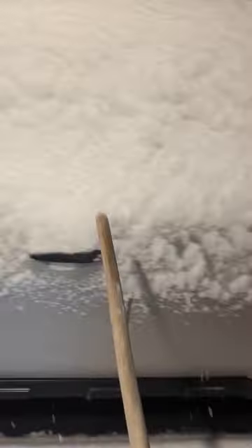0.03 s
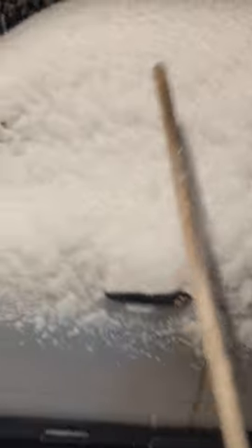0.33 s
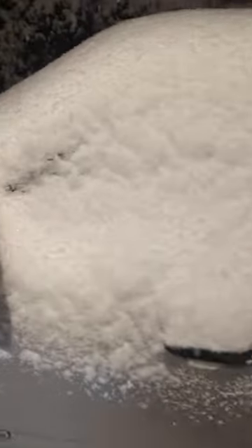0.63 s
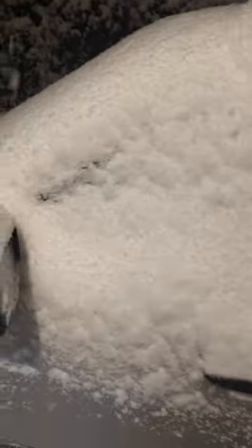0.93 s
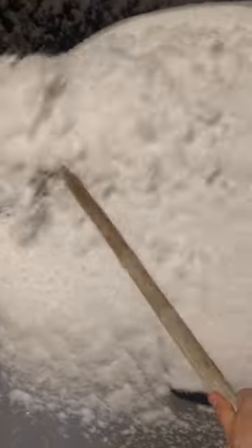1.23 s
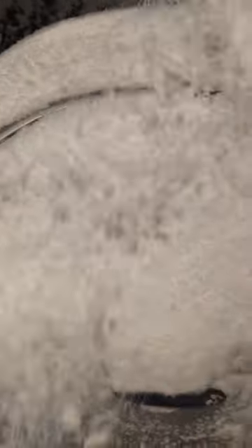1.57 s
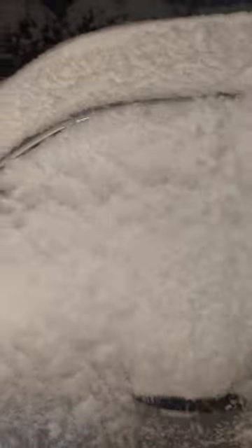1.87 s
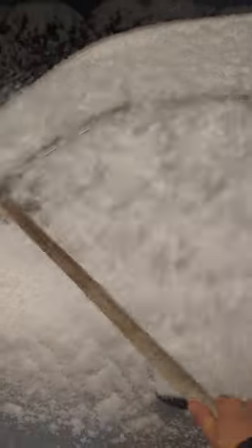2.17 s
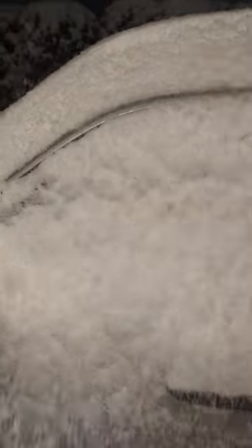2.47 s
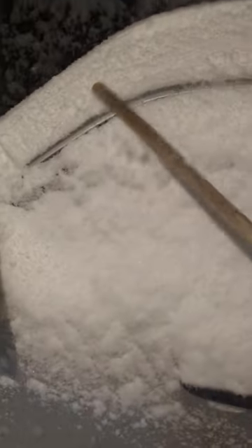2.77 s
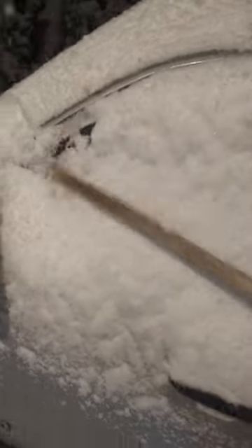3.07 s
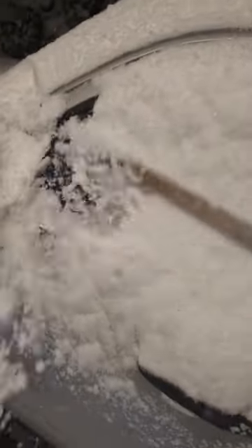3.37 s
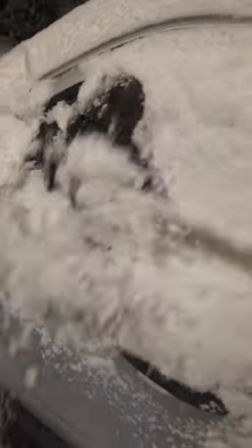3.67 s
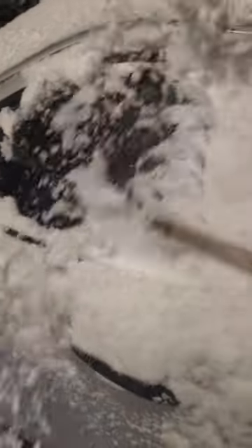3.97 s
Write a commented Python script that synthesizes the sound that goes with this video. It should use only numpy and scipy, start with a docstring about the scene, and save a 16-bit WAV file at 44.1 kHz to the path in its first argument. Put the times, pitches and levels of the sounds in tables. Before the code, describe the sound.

A wooden stick sweeps snow off a parked car in two close, crackling strokes after a muffled footstep. It then crunches through the crust, knocks dully on the door and scrapes the window, over a faint low drone outdoors.

```python
"""Sweeping snow off a parked car.

On a quiet night, a step packs the snow with dull thuds. A wooden stick makes two wide, close sweeps:
grains rustle, powder hisses, single fractures crackle. Its tip then breaks the crust, knocks on the
snow-padded door and scrapes across the window. A deep drone, like an idling engine, lies underneath."""
import sys
import numpy as np
from scipy import signal
from scipy.fft import rfft, irfft
from scipy.io import wavfile
from scipy.ndimage import uniform_filter1d

SR = 44100
rng = np.random.default_rng(int(sys.argv[2]) if len(sys.argv) > 2 else 0)


def unload_wav(signal):
    """Save mono or channel-first audio to the path in sys.argv[1] as 16-bit WAV at rate SR, clipped to [-1, 1]."""
    wavfile.write(
        sys.argv[1],
        SR,
        np.round(np.clip(np.atleast_2d(signal).T, -1, 1) * 32767).astype(np.int16),
    )


N = 176400
T = np.arange(N) / SR

# Vigour of the stick's motions. Each row: time in seconds, relative level in dB.
FIRST_SWEEP = [(.97,-85),(1.13,-49),(1.205,-43.5),(1.25,-46.5),(1.298,-66.5),(1.328,-48.5),(1.385,-87),(1.48,-82)]
RETURN_SWING = [(1.498,-52.5),(1.585,-66),(1.64,-45),(1.658,-65.5),(1.686,-41),(1.768,-47),(1.82,-54.5),(1.907,-56),(1.932,-83)]
SECOND_SWEEP = [(1.946,-50),(1.985,-51.5),(2.03,-48.5),(2.109,-43.5),(2.129,-63.5),(2.173,-49.5),(2.19,-31),(2.218,-39.5),(2.234,-48.5),(2.33,-66),(2.524,-52.5),(2.592,-78.5),(2.652,-60.5),(2.679,-100)]
POKING = [(2.70,-88),(2.76,-68.5),(2.85,-55.5),(2.895,-57.5),(3.04,-85.5),(3.18,-62),(3.28,-71.5),(3.40,-64.5),(3.73,-64),(3.82,-82),(3.885,-47.5),(3.96,-77)]
SCRAPE = [(3.35,-75),(3.39,-47),(3.52,-46.5),(3.665,-49),(3.71,-70)]
# Fractures in the sweeps. Each row: start in seconds, relative level in dB.
CRACKLES = [(1.002,-40),(1.195,-25.5),(1.243,-25.5),(1.259,-26),(1.2744,-18),(1.279,-39),(1.3097,-19),(1.3245,-25),
            (1.356,-39.5),(1.447,-46.5),(1.4949,-21.5),(1.503,-26),(1.5327,-29.5),(1.5569,-26.5),(1.6317,-36),(1.6383,-31),
            (1.681,-26),(1.691,-28),(1.7126,-32),(1.7417,-27),(1.769,-28),(1.8482,-39.5),(1.8914,-28),(1.9515,-33.5),(2.0236,-28),
            (2.06,-41),(2.0983,-31),(2.141,-30),(2.1775,-21),(2.183,-24),(2.1924,-26),(2.199,-22),(2.2204,-16.5),
            (2.2597,-26),(2.2728,-26.5),(2.376,-40.5),(2.3993,-28),(2.481,-21.5)]
# Crust breaks. Each row: start in seconds, relative level in dB, treble corner in Hz.
CRUNCHES = [(2.8395,-29,9200),(2.8917,-30.5,7000),(2.922,-30,9100),(2.934,-29.5,9000),(3.135,-32.5,7000),(3.173,-29.5,8000),(3.1985,-25,6800),(3.4554,-23,2420),(3.6673,-20.5,8460),(3.772,-27,4980),(3.8754,-28,4500),(3.883,-25,3966),(3.994,-18,13760)]
# Blows on the door. Each row: start in seconds, relative level in dB, treble gain in dB.
KNOCKS = [(2.252, -38.5, 3), (2.778, -40, 14.5), (2.793, -41, 13), (3.154, -35, 11.5), (3.178, -36, 5),
          (3.24, -25.5, -6), (3.316, -28.5, 1.5), (3.457, -27, 3), (3.539, -30, -1.5), (3.628, -35.5, -3),
          (3.667, -30, 0), (3.772, -38, -5), (3.868, -35.5, 5), (3.929, -20, -6.5)]
# Door resonances. Each row: frequency in Hz, relative level in dB, T60 in seconds.
DOOR_MODES = [(119.7,-4.5,0.16),(143,-1.5,0.1),(198,-2.5,0.065),(270,-5,0.074),(459,-13.5,0.1),(560,-4,0.05)]
# Snow giving way underfoot. Each row: start in seconds, relative level in dB.
STEP_THUDS = [(0.459, -36), (0.472, -31.5), (0.612, -29.5), (0.659, -36), (0.693, -38.5), (0.724, -35.5),
              (0.775, -34.5), (0.989, -41)]
# Packed snow resonances. Each row: frequency in Hz, gain in dB, bandwidth in Hz.
SNOW_MODES = [(353.6, 2, 61), (450, -5, 58), (753, -1.5, 40)]
# Shuffles before the first sweep. Each row: centre in seconds, level in dB.
SHUFFLES = [(0.014,-73.5),(.125,-83.5),(0.326,-81.5),(.465,-73.5),(.625,-76),(0.709,-74),(.875,-76.5)]
# Course of the drone. Each row: time in seconds, relative level in dB, frequency in Hz.
DRONE = [(0,-39,23.27),(1.381,-39.5,23.38),(1.59,-31.5,29.8),(1.68,-48.5,29.06),(2.35,-51,32),(2.72,-38,32.95),(2.88,-34,26.74),(3.15,-45,24.1),(3.95,-32,25.94)]
# Spectral shapes. Each row: frequency in Hz, relative density in dB.
RUSTLE_SPECTRUM = [(200, -15), (300, -15.5), (656, -8), (1150, -7), (2100, -2.5), (2980, -0.5), (3700, -8),
                   (4900, -1), (6300, -12), (7440, -8.5), (16000, -23)]
SWISH_SPECTRUM = [(120,2.5),(400,-2),(1200,-25.5)]
CRUNCH_SPECTRUM = [(350, -10), (600, -13.5), (1550, -7.5), (3300, -5), (6030, -12), (11000, -13.5),
                   (16000, -30)]
KNOCK_SPECTRUM = [(80,-24.5),(135,10),(300,2),(900,-8),(1500,-9.5),(14000,-47)]
SCRAPE_SPECTRUM = [(150,-0.5),(400,-18),(900,-0.5),(1450,-0.5),(3000,-11.5),(6000,-29),(13000,-36)]
STEP_SPECTRUM = [(130,-8.5),(330,-2.5),(560,-3),(800,-10),(2200,-23),(9000,-62)]
NIGHT_SPECTRUM = [(45,-8),(125,-29),(430,-35.5),(1800,-56),(15000,-82.5)]

PADDING_HZ = 243  # treble corner of a padded contact


def sweeps(crackle_gain_db=11, octaves_per_db=0.04, swish_gain_db=-32):
    """Rustle and a soft swish follow the swing; single crackles stand out, weak ones straying higher."""
    vigour = envelope(FIRST_SWEEP + RETURN_SWING + SECOND_SWEEP)
    loudest_db = max(db for _, db in CRACKLES)
    crackles = np.zeros(N)
    for start_s, db in CRACKLES:
        hz = 1990 * 2 ** (octaves_per_db * (loudest_db - db) * rng.random())
        snap = crack(hz, scatter_s=0.0057, snap_gain=0.8, resonance_db=5, q=4.9)
        add(crackles, start_s, from_db(db + crackle_gain_db) * snap)
    snow = door_reflection(rustle(vigour, grain_db=0.5)) + low_pass(crackles, 7000)
    swish = np.sqrt(vigour) * grains(per_s=500, spread_db=0.7)
    return colour(snow, RUSTLE_SPECTRUM) + from_db(swish_gain_db) * colour(swish, SWISH_SPECTRUM)


def rustle(vigour, grain_db, powder_db=-17):
    """Dense snow grains come in fits; the smooth hiss of powder outlasts them."""
    fits = from_db(grain_db + 2 * drift(corner_hz=30))
    powder = from_db(powder_db) * vigour ** 0.83 * rng.standard_normal(N)
    snow_grains = vigour * fits * grains(per_s=3600, spread_db=6)
    return low_pass(snow_grains, 8500) + powder


def door_reflection(x, gain=0.45):
    """Adds a near reflection off the door; its delay wanders as the arm moves."""
    delay_s = 0.000705 * np.exp(0.24 * drift(corner_hz=1.89))
    return x + gain * np.interp(T - delay_s, T, x)


def pokes(gain_db=9.5):
    """The tip breaks the crust over a light rustle; deeper snow gives a duller crunch."""
    crunches = np.zeros(N)
    for start_s, db, top_hz in CRUNCHES:
        hz = 2260 * 2 ** rng.uniform(-0.79, 0.43)
        snap = crack(hz, scatter_s=0.0042, snap_gain=0.56, resonance_db=-16, q=2)
        muffled = low_pass(low_pass(snap, top_hz), top_hz)
        add(crunches, start_s, from_db(db + gain_db) * unit_energy(muffled))
    return colour(crunches + rustle(envelope(POKING), grain_db=4), CRUNCH_SPECTRUM)


def knocks(thud_gain_db=15.5, door_gain_db=-7.5):
    """Padded blows thud and ring the door's low modes; soft ones favour the lowest."""
    hits = thuds(KNOCKS, scatter_s=0.0049, onset=0.37)
    hits = hits + tail(hits, gain_db=-12.5, t60_s=0.33, top_hz=666)
    out = from_db(thud_gain_db) * colour(hits, KNOCK_SPECTRUM)
    for hz, mode_db, t60_s in DOOR_MODES:
        treble_share = hz / (hz + 2 * PADDING_HZ)
        blows = np.zeros(N)
        for start_s, db, treble_db in KNOCKS:
            blow_db = db + mode_db + door_gain_db + treble_db * treble_share + rng.normal(0, 1)
            add(blows, start_s, from_db([blow_db]))
        out += ring(blows, hz, t60_s)
    return out


def scrape():
    """Fine grains as the tip pushes snow along the glass."""
    return colour(envelope(SCRAPE) * grains(per_s=5000, spread_db=3), SCRAPE_SPECTRUM)


def step(gain_db=17.5):
    """A foot packs the snow in muffled jerks that ring briefly and leave a dull tail."""
    jerks = thuds(STEP_THUDS, scatter_s=0.0064, onset=0.27)
    ringing = sum(from_db(db) * band_pass(jerks, hz, q=hz / width_hz) for hz, db, width_hz in SNOW_MODES)
    packed = jerks + ringing
    packed += tail(packed, gain_db=-11.5, t60_s=0.12, top_hz=746)
    return from_db(gain_db) * colour(packed, STEP_SPECTRUM)


def shuffles(width_s=0.04):
    """Faint swishes of loose snow swell and fade."""
    swell = sum(from_db(db) * np.exp(-((T - centre_s) / width_s) ** 2) for centre_s, db in SHUFFLES)
    return colour(swell * rng.standard_normal(N), CRUNCH_SPECTRUM)


def drone(gain_db=-2, waver_db=1.4):
    """A deep sine glides in pitch and wavers in level."""
    times_s, db, hz = np.transpose(DRONE)
    phase = 2 * np.pi * np.cumsum(np.interp(T, times_s, hz)) / SR
    rms = from_db(np.interp(T, times_s, db) + gain_db + waver_db * drift(corner_hz=19))
    return np.sqrt(2) * rms * np.sin(phase)


def night(level_db=-50.5):
    """Faint, steady hush, mostly bass."""
    return from_db(level_db) * colour(rng.standard_normal(N), NIGHT_SPECTRUM)


def crack(hz, scatter_s, snap_gain, resonance_db, q):
    """Brittle fracture: a loose spray and a tight snap, ringing briefly; unit energy."""
    spray = burst(scatter_s, onset=0, per_s=7000)
    snap = burst(scatter_s=0.001, onset=0.6, per_s=12000)
    fracture = spray + snap_gain * snap
    return unit_energy(fracture + from_db(resonance_db) * band_pass(fracture, hz, q))


def thuds(rows, scatter_s, onset):
    """Impacts, each with an optional treble gain."""
    out = np.zeros(N)
    for start_s, db, *treble_db in rows:
        hit = from_db(db) * burst(scatter_s, onset, per_s=4000)
        bass = low_pass(hit, PADDING_HZ)
        add(out, start_s, bass + from_db(sum(treble_db)) * (hit - bass))
    return out


def burst(scatter_s, onset, per_s, size=4096):
    """An onset click and a dying spray of grains; unit energy."""
    spray = unit_energy(grains(per_s, spread_db=1.7, size=size) * np.exp(-T[:size] / scatter_s))
    spray[0] = onset
    return unit_energy(spray)


def grains(per_s, spread_db, size=N):
    """Random micro-fractures of uneven size, evened to unit rms."""
    clicks = (rng.random(size) < per_s / SR) * rng.choice([-1, 1], size)
    clicks = clicks * from_db(spread_db * np.minimum(rng.exponential(1, size), 4))
    local_power = uniform_filter1d(clicks ** 2, 700)
    return clicks / np.sqrt(np.maximum(local_power, 1e-4))


def tail(x, gain_db, t60_s, top_hz, size=16384):
    """Diffuse decay of x: convolution with dull, dying noise."""
    response = low_pass(rng.standard_normal(size), top_hz) * np.exp(-np.log(1000) * T[:size] / t60_s)
    return from_db(gain_db) * signal.fftconvolve(x, unit_energy(response))[:N]


def colour(x, spectrum, size=8192):
    """Unit-energy filter of the given shape, falling away below its first point."""
    hz, db = np.transpose(spectrum)
    bins_hz = np.maximum(np.fft.rfftfreq(size, 1 / SR), 1)
    gain = from_db(np.interp(np.log(bins_hz), np.log(hz), db))
    gain *= np.minimum(bins_hz / hz[0], 1) ** 2
    cepstrum = irfft(np.log(gain))
    cepstrum[1:size // 2] *= 2  # fold to minimum phase
    cepstrum[size // 2 + 1:] = 0
    response = irfft(np.exp(rfft(cepstrum)))
    return signal.fftconvolve(x, unit_energy(response))[:N]


def ring(x, hz, t60_s):
    """Damped mode: a unit click starts a unit sine."""
    radius, angle = 10 ** (-3 / (t60_s * SR)), 2 * np.pi * hz / SR
    return signal.lfilter([0, np.sin(angle)], [1, -2 * radius * np.cos(angle), radius ** 2], x + 1e-18)


def band_pass(x, hz, q):
    """Resonance with unit peak gain."""
    return signal.lfilter(*signal.iirpeak(hz, q, SR), x)


def low_pass(x, hz):
    """One-pole low-pass."""
    pole = np.exp(-2 * np.pi * hz / SR)
    return signal.lfilter([1 - pole], [1, -pole], x)


def drift(corner_hz):
    """Slow noise with unit deviation."""
    slow = low_pass(low_pass(rng.standard_normal(N), corner_hz), corner_hz)
    return slow / slow.std()


def envelope(rows):
    """Gain through (seconds, dB) points, silent outside them."""
    return from_db(np.interp(T, *np.transpose(rows), left=-120, right=-120))


def from_db(db):
    """Decibels to gain."""
    return 10 ** (np.asarray(db) / 20)


def unit_energy(x):
    """Scales x to energy one."""
    return x / np.sqrt(np.sum(x ** 2) + 1e-20)


def add(out, start_s, x):
    """Mixes x into out."""
    i = int(np.clip(start_s * SR, 0, N - 1))
    out[i:i + len(x)] += x[:N - i]


def scene():
    """Mono mix, nearly dry in the snowy air; brief scatter off the car and the ground."""
    near = step() + shuffles() + sweeps() + pokes() + knocks() + scrape()
    scatter = tail(near, gain_db=-17, t60_s=0.052, top_hz=4050)
    return (near + scatter + drone() + night())[None]


def record(dry, cutoff_hz=16000):
    """Steep treble cut."""
    return signal.sosfilt(signal.ellip(12, .1, 80, cutoff_hz, fs=SR, output="sos"), dry)


dry = scene()
out = record(dry)
unload_wav(out)
```